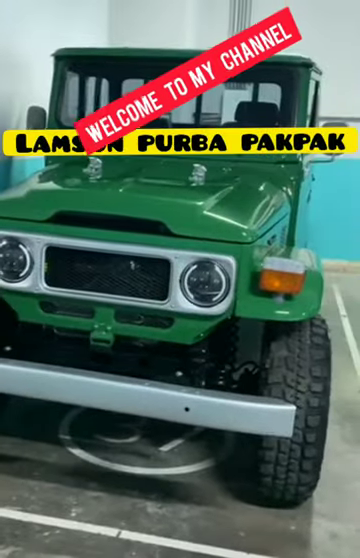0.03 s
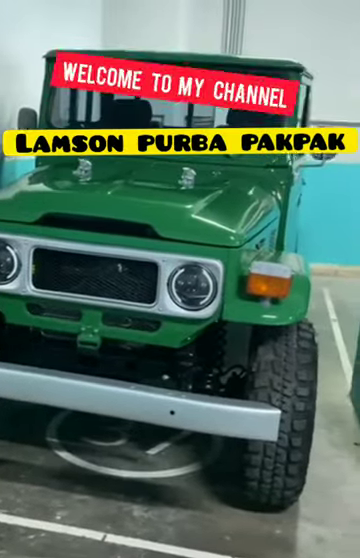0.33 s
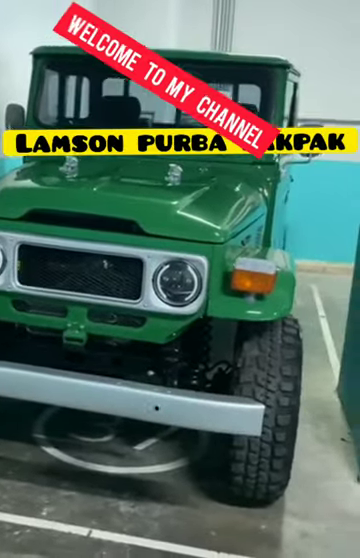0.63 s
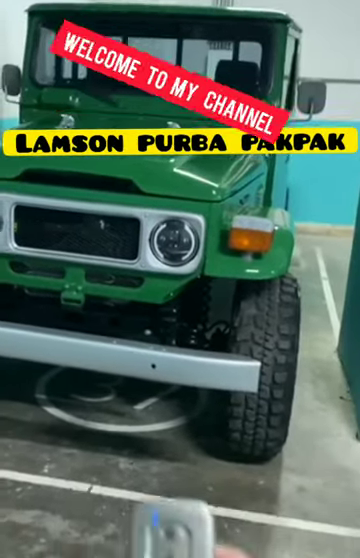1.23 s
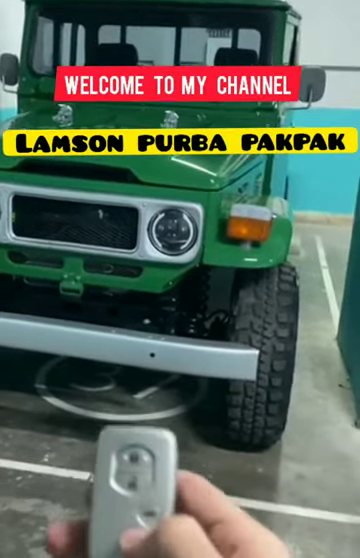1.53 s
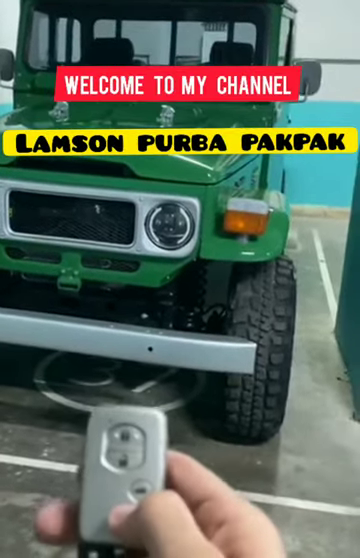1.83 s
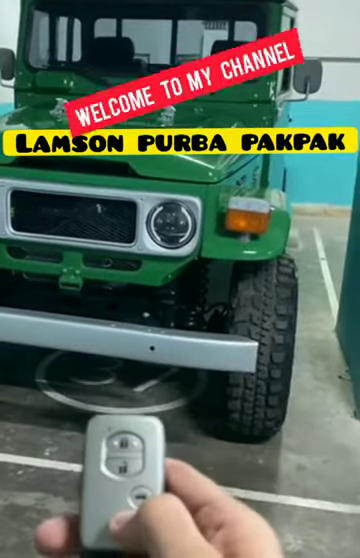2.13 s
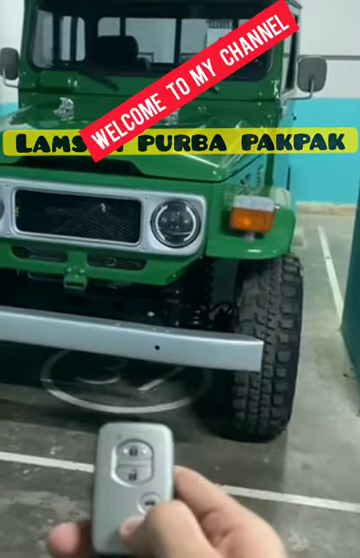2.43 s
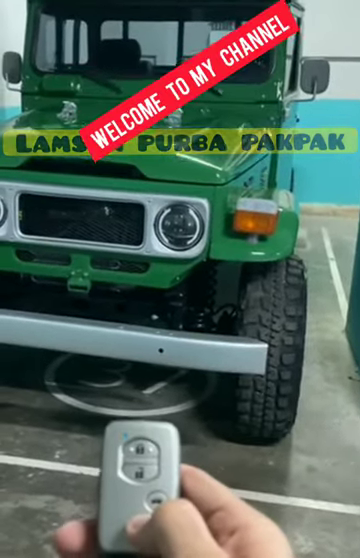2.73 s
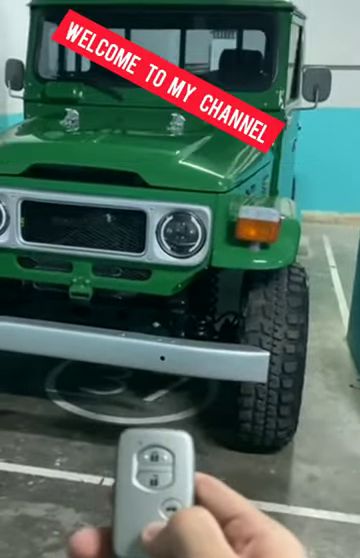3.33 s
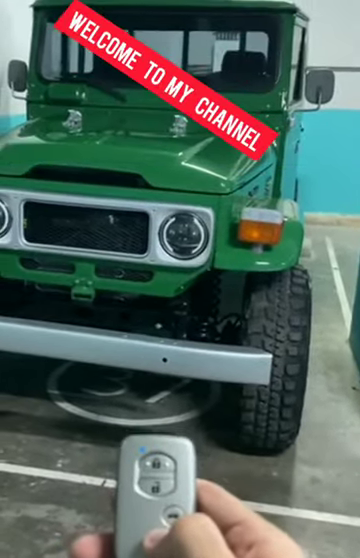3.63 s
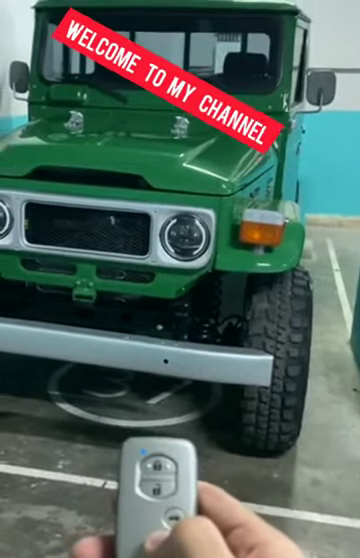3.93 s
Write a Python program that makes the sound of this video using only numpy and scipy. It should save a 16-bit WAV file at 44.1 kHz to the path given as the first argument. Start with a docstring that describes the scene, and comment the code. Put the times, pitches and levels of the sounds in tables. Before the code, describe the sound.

Low, steady engine idle of an off-road vehicle over fan noise, faltering at the very end.

```python
"""An off-road vehicle's exhaust, idling in a concrete parking garage and running down at the very end.
One microphone stands in front of the bumper. The firing pulses drone on their first few harmonics,
which swell and fade as the microphone shifts in the hall. Uneven cylinders add a lope, and puffs of gas
burble louder as the engine falters. Behind it fans rush and whine faintly, two light ticks sound
just past halfway, and a thin whistle swells near the end."""
import sys
import numpy as np
from scipy import signal
from scipy.io import wavfile

SR = 44100
rng = np.random.default_rng(int(sys.argv[2]) if len(sys.argv) > 2 else 0)


def log_audio(samples):
    """Write samples as a 16-bit WAV file to the path given in sys.argv[1]."""
    # one column per channel
    frames = np.atleast_2d(samples).T
    # limit to full scale, then quantise
    limited = np.clip(frames, -1, 1)
    pcm = np.round(limited * 32767).astype(np.int16)
    wavfile.write(sys.argv[1], SR, pcm)


N = 176400

# engine speed, as firings per second: time_s, firing_hz
FIRING_RATE = [(0.0, 49.2), (0.1, 49), (0.19, 48.4), (0.79, 48.8), (1.34, 50), (1.44, 48.4), (2.1, 49.4),
               (2.17, 49), (2.62, 49.2), (3.34, 48.2), (3.41, 48.3), (3.8, 47.9), (3.83, 47.1),
               (3.85, 45.9), (3.91, 41), (3.93, 40.2), (3.95, 39.8), (4.0, 39.7)]
# how unsteadily the engine runs, from 0 to 1: time_s, amount
FALTER = [(0,0),(3,0.01),(3.4,.25),(3.78,0.3),(3.86,0.94),(4,0.68)]
# lowest exhaust harmonics, at mid-scene: firing_multiple, level_db
LOW_HARMONICS = [(1,-21),(2,-22)]
# booming third harmonic at the microphone: time_s, level_db
THIRD_HARMONIC = [(0,-16.5),(.17,-12),(.42,-12.5),(.5,-14),(.72,-14),(1.1,-18.5),(1.4,-18.5),(1.6,-15.5),(1.85,-16),(2.15,-19.5),(2.38,-13.2),(2.55,-14),(2.72,-15.5),(2.93,-19.5),(3.1,-12),(3.3,-14),(3.5,-12.3),(3.78,-13),(3.88,-18.5),(4,-14.5)]
# fourth harmonic: time_s, level_db
FOURTH_HARMONIC = [(0,-16.5),(.8,-17.5),(1.3,-21),(1.9,-16.3),(2.15,-18),(2.4,-15),(3,-18),(3.25,-22),(3.7,-18.5),(4,-34)]
# fifth harmonic: time_s, level_db
FIFTH_HARMONIC = [(0,-22.5),(.15,-28),(.42,-26.5),(.52,-21),(2.1,-21),(2.35,-27.5),(2.65,-22),(2.98,-20),(3.1,-33),(3.3,-25),(3.8,-22),(4,-28)]
# sixth harmonic, which the eighth follows: time_s, level_db
SIXTH_HARMONIC = [(0,-47),(.5,-42.5),(.95,-32),(1.3,-32.5),(1.6,-36.5),(2.02,-29.5),(2.2,-37.5),(2.85,-35),(3.1,-47),(4,-40)]
# tones from unequal cylinders: engine_cycle_multiple, level_db
LOPE_TONES = [(8,-30.5),(9,-32.5),(14,-37),(15,-28),(16,-36),(17,-41.5),(20,-39),(22,-41),(26,-51),(28,-47),(32,-42.5),(34,-40),(42,-51.5),(45,-41.5)]
# low end of the rush of fan and hall: frequency_hz, relative_density_db
RUMBLE_SPECTRUM = [(20,-11),(45,-2),(100,-2),(200,1)]
# the rest of that rush: frequency_hz, relative_density_db
RUSH_SPECTRUM = [(300,-1),(350,-2),(450,-4.5),(540,-3),(700,-2.5),(850,-8),(1100,-6),(1500,-7.5),(2000,-10),(2600,-13),(4000,-16.5),(4800,-18.5),(5500,-21),(7700,-25),(8100,-28.5),(9500,-27.5),(10800,-30),(11800,-37.5)]
# rise and fall of the rush's treble, taken about its mean: time_s, relative_db
HISS_SWELL = [(0,-32.5),(.6,-33),(1.37,-35),(2.35,-33.5),(2.65,-35),(3.4,-35.5),(3.74,-35),(3.79,-29.5),(3.85,-35),(4,-38.5)]
# a fan's blade tone: time_s, level_db
BLADE_LEVEL = [(0,-38.5),(.4,-40),(.8,-37),(1.1,-38),(1.4,-34.5),(1.8,-35.5),(2.15,-35),(2.5,-40.5),(2.9,-32),(3.2,-34),(3.65,-32),(4,-39)]
# the octave above the blade tone: time_s, level_db
BLADE_OCTAVE_LEVEL = [(0,-40),(.25,-34.5),(.8,-32.5),(1.22,-40),(1.7,-38),(2.1,-39),(2.72,-36),(2.87,-43),(3.3,-39),(3.68,-35),(4,-42)]
# electric fans and pumps: pitch_hz, level_db, wander_hz
MOTOR_WHINES = [(1530,-42,8),(1877,-44,2.5),(8074,-64,1.5),(8567,-61,1.5),(9110,-64,12),(9457,-63.5,1.5)]
# a thin whistle: time_s, level_db
WHISTLE_LEVEL = [(0,-60),(2.98,-56),(3.07,-33.5),(3.28,-32),(3.37,-40),(3.47,-32),(3.65,-44),(4,-50)]
# light ticks: start_s, level_db
TICKS = [(2.236,-34),(2.354,-30.5)]

CYLINDERS = 6
PIPE_HZ, PIPE_WIDTH_HZ = 129, 18.4  # the exhaust's main resonance


def exhaust(firing_hz, firing_angle, falter, fade_db_per_s=0.5, waver_db=0.63, shake_db=2.5):
    """Harmonics of the firing pulses, delayed by the pipe resonance; faltering shakes the overtones."""
    fade_db = fade_db_per_s * (N / 2 - np.arange(N)) / SR
    levels = [(round(harmonic), db + fade_db) for harmonic, db in LOW_HARMONICS]
    levels += [(3, curve(THIRD_HARMONIC)), (4, curve(FOURTH_HARMONIC)), (5, curve(FIFTH_HARMONIC))]
    levels += [(6, curve(SIXTH_HARMONIC)), (8, curve(SIXTH_HARMONIC) - 3)]
    limp = 1 + (0.022 + 0.29 * falter) * np.cos(firing_angle / 2)  # every other firing is weaker
    drone = 0
    for harmonic, db in levels:
        lag_rad = 0.63 + np.arctan(2 * (harmonic * firing_hz - PIPE_HZ) / PIPE_WIDTH_HZ)
        shake = limp * from_db(shake_db * falter * drift(26.9)) if harmonic > 1 else 1
        drone += shake * tone(harmonic * firing_angle - lag_rad, db + waver_db * drift(6))
    return drone


def lope(firing_angle):
    """Unequal cylinders add weak tones between the firing harmonics, repeating once an engine cycle."""
    cycle_angle = firing_angle / CYLINDERS
    return sum(tone(round(multiple) * cycle_angle + rng.uniform(0, 2 * np.pi), db)
               for multiple, db in LOPE_TONES)


def burble(firing_angle, falter, idle_db=-34.5, falter_gain_db=17.5):
    """Turbulent gas puffs out with each firing, louder as the engine falters."""
    puffs = band_noise(108, 269, order=4) * (1 + 0.5 * np.cos(firing_angle))
    return from_db(idle_db + falter_gain_db * falter) * unit_rms(puffs)


def fan_rush(firing_angle, level_db=-22.5, flicker_db=0.96, hiss_corner_hz=3400):
    """Fan air fills the hall with a broad, flickering rush that pulses slightly with the engine."""
    edges_hz = 20 * 2 ** (np.arange(48) / 5)  # five bands an octave
    spectrum_hz, spectrum_db = np.transpose(RUMBLE_SPECTRUM + RUSH_SPECTRUM)
    hiss_db = curve(HISS_SWELL)
    hiss_db -= hiss_db.mean()
    rush = 0
    for low, high in zip(edges_hz, edges_hz[1:]):
        centre_hz = np.sqrt(low * high)
        band_db = np.interp(np.log(centre_hz), np.log(spectrum_hz), spectrum_db)
        band_db += flicker_db * drift(11.7)
        band_db += hiss_db * centre_hz / (centre_hz + hiss_corner_hz)
        rush += from_db(band_db) * np.sqrt(high - low) * band_noise(low, high, order=3)
    pulse = 1 + 0.021 * np.cos(firing_angle)
    return from_db(level_db) * unit_rms(rush) * pulse


def fan_blades(pitch_hz=493.9, wander_hz=1.4, waver_db=1.0):
    """Passing fan blades hum behind the engine, on one tone and its octave."""
    angle = running_angle(pitch_hz + wander_hz * drift(13.5))
    fundamental = tone(angle, curve(BLADE_LEVEL) + waver_db * drift(10))
    octave = tone(2 * angle, curve(BLADE_OCTAVE_LEVEL) + waver_db * drift(10))
    return fundamental + octave


def motor_whines(waver_db=3.5):
    """Electric fans and pumps whine thinly in the background, wavering in pitch and level."""
    whines = 0
    for pitch_hz, level_db, wander_hz in MOTOR_WHINES:
        angle = running_angle(pitch_hz + wander_hz * drift(11.6))
        whines += from_db(level_db) * unit_rms(tone(angle, waver_db * drift(3.6)))
    return whines


def whistle(pitch_hz=1503, wander_hz=5, waver_db=1.5):
    """A thin whistle swells briefly before the engine runs down."""
    angle = running_angle(pitch_hz + wander_hz * drift(12.5))
    return tone(angle, curve(WHISTLE_LEVEL) + waver_db * drift(9.4))


def ticks(pitch_hz=4800, width_hz=250, decay_s=0.016):
    """Brief high rings reach the microphone barely above the rush."""
    t = np.arange(N) / SR
    envelope = sum(from_db(level_db) * (t >= start_s) * np.exp(-np.abs(t - start_s) / decay_s)
                   for start_s, level_db in TICKS)
    return envelope * band_noise(pitch_hz - width_hz / 2, pitch_hz + width_hz / 2)


def from_db(db):
    """Decibels to gain."""
    return 10 ** (np.asarray(db) / 20)


def unit_rms(x):
    """Scale to rms 1."""
    return x / np.sqrt(np.mean(x ** 2) + 1e-20)


def curve(rows):
    """Join (time_s, value) rows with straight lines, one value a sample."""
    time_s, value = np.transpose(rows)
    return np.interp(np.arange(N) / SR, time_s, value)


def drift(corner_hz):
    """Slow random motion with rms about 1, mostly below the corner."""
    hop, settle_steps = 40, 2000
    pole = np.exp(-2 * np.pi * corner_hz * hop / SR)
    noise = rng.standard_normal(N // hop + settle_steps + 2)
    slow = signal.lfilter([1], [1, -2 * pole, pole * pole], noise)[settle_steps:]
    return np.interp(np.arange(N) / hop, np.arange(len(slow)), unit_rms(slow))


def band_noise(low_hz, high_hz, order=2):
    """Noise in one band, rms 1."""
    bandpass = signal.butter(order, [low_hz, high_hz], "band", fs=SR, output="sos")
    return unit_rms(signal.sosfilt(bandpass, rng.standard_normal(N + SR // 2))[-N:])


def running_angle(hz):
    """Phase in radians of something that repeats at this rate."""
    return 2 * np.pi * np.cumsum(hz) / SR


def tone(angle, db):
    """A sine of the given rms level."""
    return np.sqrt(2) * from_db(db) * np.cos(angle)


def scene():
    """The engine with the fans behind it, in mono from in front of the bumper."""
    falter = curve(FALTER)
    speed_jitter = 0.0021 * drift(9.7) + 0.04 * falter * drift(24.5)
    firing_hz = curve(FIRING_RATE) * (1 + speed_jitter)
    firing_angle = running_angle(firing_hz)
    engine = exhaust(firing_hz, firing_angle, falter) + lope(firing_angle) + burble(firing_angle, falter)
    background = fan_rush(firing_angle) + fan_blades() + motor_whines() + whistle() + ticks()
    return (engine + background)[None]


def record(dry, peak_limit=0.92, cutoff_hz=12000):
    """The highest peaks are rounded and the top treble is cut steeply."""
    rounded = dry / (1 + (dry / peak_limit) ** 10) ** (1 / 10)
    lowpass = signal.ellip(12, 0.2, 80, cutoff_hz, fs=SR, output="sos")
    return signal.sosfilt(lowpass, rounded)


dry = scene()
out = record(dry)
log_audio(out)
```